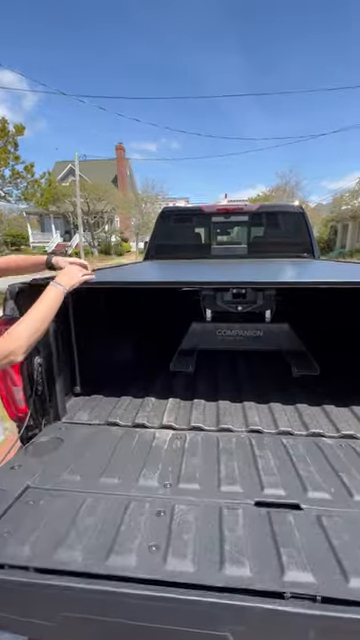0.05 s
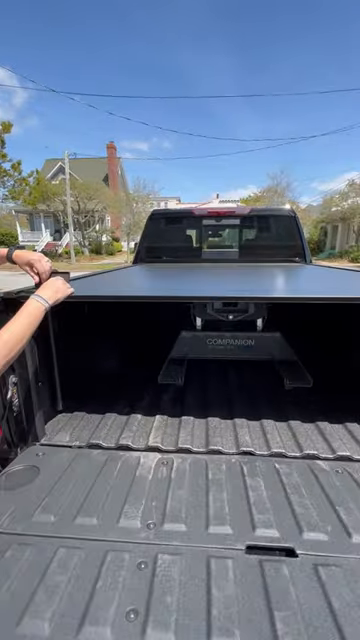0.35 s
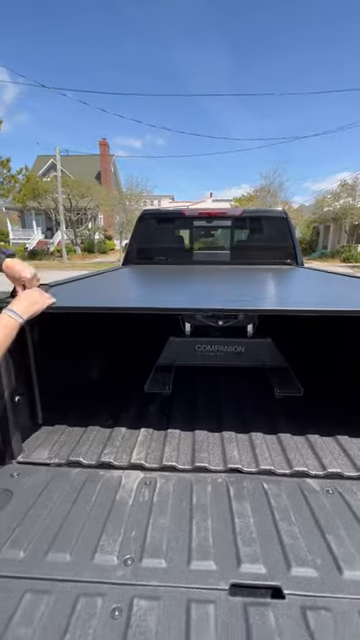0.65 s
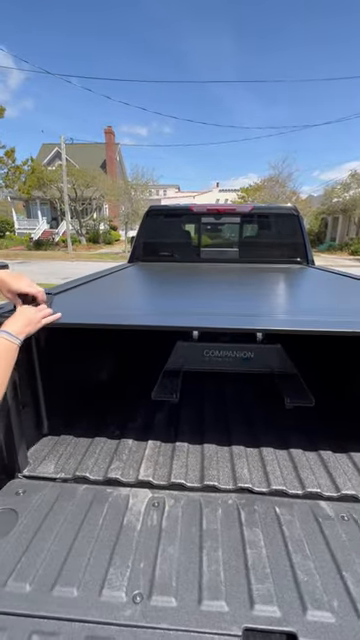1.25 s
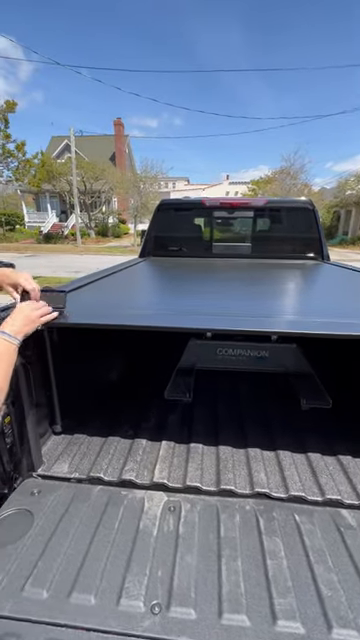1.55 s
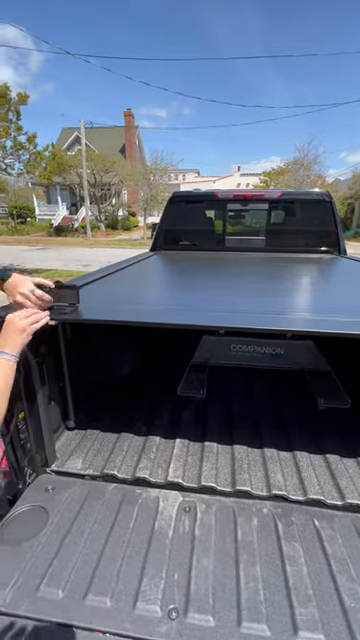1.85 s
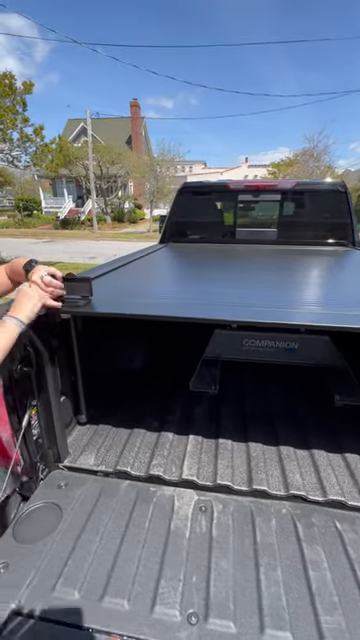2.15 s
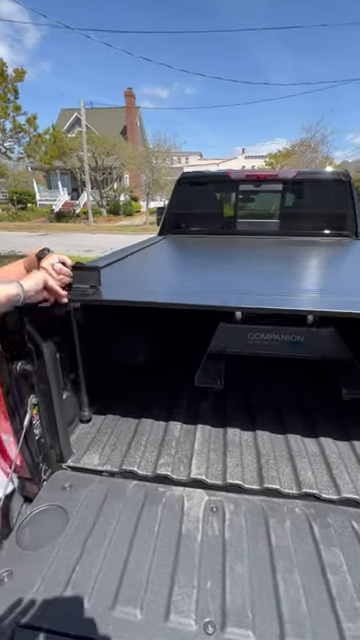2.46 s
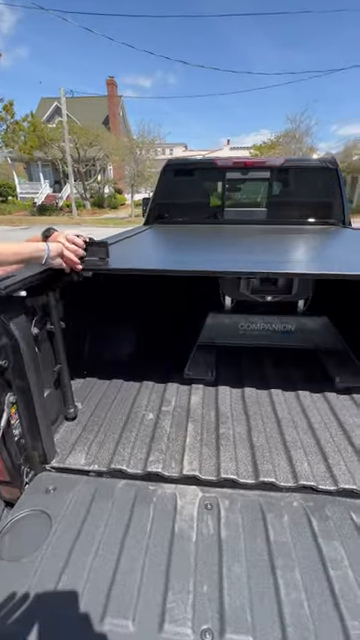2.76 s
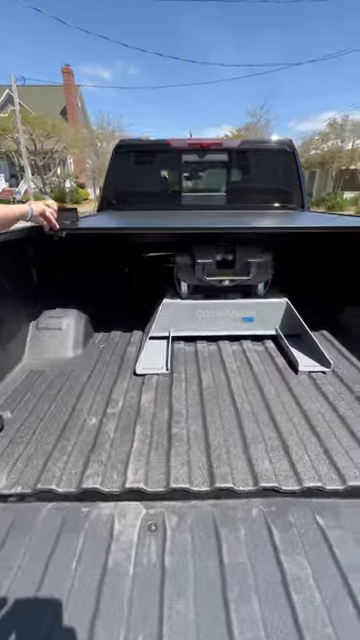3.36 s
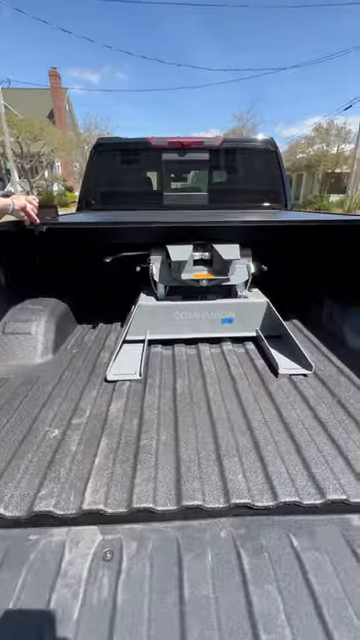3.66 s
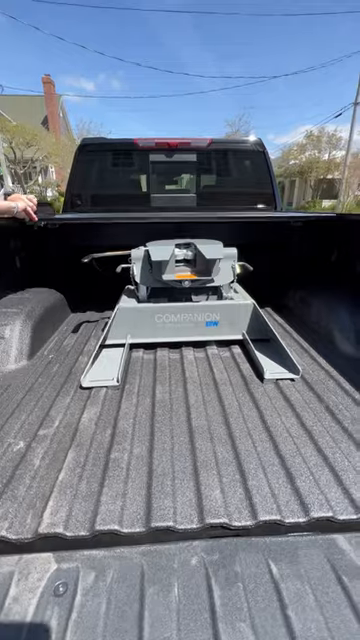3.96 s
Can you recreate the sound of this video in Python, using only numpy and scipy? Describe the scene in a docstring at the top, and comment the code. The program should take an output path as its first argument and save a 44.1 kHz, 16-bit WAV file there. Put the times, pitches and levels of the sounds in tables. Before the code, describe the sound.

Close by outdoors, a slatted truck bed cover clicks and scrapes at its latch, then slides open, clattering on metal rails and drumming on the hollow bed. A bird whistles faintly at first over a steady low hum.

```python
"""Outdoors, about a metre from a pickup bed, a slatted roll-up cover is unlatched and pushed open.
A low hum like an idling engine runs throughout, and a songbird whistles at first. Friction and impacts
excite the modes of the metal latch and the hollow bed. From about 2 s the slats rattle along their
metal rails and drum on the bed, and two resonances glide as the cover rolls up."""
import sys
import numpy as np
from scipy import signal
from scipy.fft import rfft, irfft
from scipy.io import wavfile
from scipy.ndimage import uniform_filter1d, map_coordinates

SR = 44100
rng = np.random.default_rng(int(sys.argv[2]) if len(sys.argv) > 2 else 0)


def waveform_to_disk(signal):
    """Save audio, clipped to [-1, 1], as 16-bit WAV at the path in sys.argv[1]."""
    frames = np.transpose(np.atleast_2d(signal))
    scaled = np.clip(frames, -1, 1) * 32767
    samples = np.round(scaled).astype(np.int16)
    wavfile.write(sys.argv[1], SR, samples)


N = 176400
T = np.arange(N) / SR
F = np.fft.rfftfreq(2 * N, 1 / SR)
ANTIPHASE = np.array([[1], [-1]])  # a side signal adds on the left and subtracts on the right

# modes of the metal latch (frequency [Hz], relative level [dB], T60 [s])
LATCH_MODES = [(1150, -7, 0.12), (1375, -10, 0.17), (1638, -11, 0.23), (2267, -5, 0.098), (2580, -14, .22),
               (2930, -15, 0.13), (3350, -5.5, 0.058), (3940, -14, 0.067), (4590, -14, 0.075),
               (5810, -6, 0.052), (5890, -21, 0.2), (7000, -5.5, 0.075), (7520, -10, 0.092),
               (8230, -8, 0.077)]


def undb(db):
    """Amplitude ratio of a level in decibels."""
    return np.exp(np.asarray(db) * (np.log(10) / 20))


def unit(x):
    """Normalisation to an rms of 1."""
    return x / np.sqrt(np.mean(x ** 2))


def noise():
    """Gaussian white noise."""
    return rng.standard_normal(N)


def gains(points):
    """Magnitude response through points of (frequency [Hz], level [dB])."""
    hz, db = np.array(points).T
    return undb(np.interp(np.log(F + 1), np.log(hz), db))


def shape(x, response):
    """Convolution as a product of spectra."""
    return irfft(rfft(x, 2 * N) * response)[..., :N]


def walk(rate):
    """Random modulation of rms 1, interpolated between `rate` values a second."""
    return unit(np.interp(T * rate, np.arange(4000), rng.standard_normal(4000)))


def wide(response, side):
    """Coloured stereo noise; an independent side signal lowers the coherence of the channels."""
    mid, edge = (unit(shape(noise(), response)) for _ in range(2))
    return mid + side * edge * ANTIPHASE


def decay(t, t60):
    """Exponential damping from t = 0, by 60 dB in t60 seconds."""
    return (t >= 0) * np.exp(-np.log(1000) * np.maximum(t, 0) / t60)


def street():
    """Broadband rumble under hum partials with slow amplitude and phase modulation."""
    air_spectrum = [(20, -77), (42, -1.5), (80, 5), (125, 0), (230, -6), (330, -19), (700, -20.5),
                    (1500, -30.5), (3300, -35.5), (6000, -43), (9000, -53), (14000, -58)]  # outdoor rumble (frequency [Hz], level [dB])
    air_levels = [(0, -46.5), (1.2, -44), (2, -45.5), (4, -39)]  # its envelope (time [s], level [dB])
    hum_partials = [(81, -50), (129, -51), (210, -58), (291, -68)]  # engine-like hum (frequency [Hz], level [dB])
    air, spread = gains(air_spectrum), gains([(100, -13.5), (400, -3.5), (2000, 1)])
    side = shape(noise(), air * spread) / np.std(shape(noise(), air))
    rumble = unit(shape(noise(), air)) + side * ANTIPHASE
    hum = sum(np.sqrt(2) * undb(db + 1.6 * walk(7.9)) * np.sin(2 * np.pi * hz * T + 0.28 * walk(5.4))
              for hz, db in hum_partials)
    return rumble * undb(np.interp(T, *np.array(air_levels).T)) + hum


def metal_noise(spectrum, lift_db=5, width_hz=170):
    """Resonance lifts a noise spectrum around each mode of the latch."""
    peaks = sum(1 / (1 + (2 * (F - hz) / width_hz) ** 2) for hz, _, _ in LATCH_MODES)
    return wide(gains(spectrum) * undb(lift_db * peaks), side=0.74)


def scrapes(tick, hollow, rise_s=0.00099, release_s=0.023):
    """Friction with an uneven grip drives the latch and the bed with modulated noise."""
    # rubs of latch and cover (time [s], duration [s], body level [dB], treble level [dB])
    strokes = [(0, 0.041, -55, -56.5), (0.06, 0.12, -62.5, -75), (0.959, 0.055, -56.5, -65.5),
               (1.107, 0.01, -55, -75), (1.155, 0.047, -55, -72), (1.189, 0.15, -60.5, -80),
               (1.687, 0.04, -55, -68)]
    rub_spectrum = [(100, -5), (600, -0.5), (1600, -4.5), (3500, -5.5), (5000, -23), (12000, -35)]  # friction noise (frequency [Hz], level [dB])
    rub = metal_noise(rub_spectrum) + undb(-3.5) * hollow
    grip = undb(3 * walk(170))
    out = np.zeros((2, N))
    for start, length, db, treble_db in strokes:
        envelope = np.clip((T - start) / rise_s, 0, 1)
        envelope *= np.exp(-np.maximum(T - start - length, 0) / release_s)
        out += envelope * grip * (undb(db) * rub + undb(treble_db) * tick)
    return out


def latch():
    """Impact and friction excite the same resonators: the metal latch and the hollow bed."""
    # spectra of click, bright tick and hollow bed (frequency [Hz], level [dB])
    click_spectrum = [(100, -12), (400, 4), (750, -7), (1200, 5), (2500, 4), (3400, 3), (4400, -2.5),
                      (4900, -17), (5800, -12), (9000, -26), (14000, -48)]
    tick_spectrum = [(2000, -4), (4800, 2), (5800, 2.5), (7000, -0.5), (8400, 3), (9400, 1), (10500, -7.5),
                     (12000, -1), (15000, -25)]
    bed_spectrum = [(120, -29), (230, 1.5), (370, -3.5), (470, -4.5), (600, -2), (850, -2.5), (1100, -16),
                    (2000, -51)]
    body, tick = metal_noise(click_spectrum), metal_noise(tick_spectrum)
    hollow = wide(gains(bed_spectrum), side=0.41)
    return (clicks(body, tick, hollow) + scrapes(tick, hollow)) * undb(0.35 * ANTIPHASE)


def bird():
    """Frequency-modulated whistles and falling slurs, scattered by leaves and reflected by houses."""
    # contour of a whistle (time from onset [s], frequency [Hz], relative level [dB])
    contour = [(0, 2692, -12), (.005, 2760, -1.5), (0.019, 2887, -8), (0.035, 3164, -9), (.05, 2946, -9),
               (0.058, 2605, 0), (0.073, 2525, 1), (.105, 2470, -2), (.12, 2450, -14), (.13, 2430, -35)]
    whistles = [(.436, -44, 0.98), (0.613, -45, 0.97)]  # calls (time [s], level [dB], pitch [ratio])
    # falling notes (time [s], duration [s], start [Hz], end [Hz], level [dB], pitch waver [ratio])
    slurs = [(0.068, 0.032, 4880, 4250, -53.5, .004), (0.257, 0.073, 5580, 4680, -65.5, .05),
             (0.309, 0.066, 3840, 2960, -61, .05), (0.412, 0.044, 3670, 3110, -51.5, .03),
             (0.596, 0.028, 3400, 3050, -53.5, 0.028)]
    song, waver, wobble = np.zeros(N), 1 + 0.021 * walk(250), walk(301)
    times, hz, db = np.array(contour).T
    for start, call_db, ratio in whistles:
        phase = 2 * np.pi * np.cumsum(np.interp(T - start, times, hz) * ratio * waver) / SR
        tone = np.sin(phase) + undb(-33) * np.sin(2 * phase) + undb(-31) * np.sin(3 * phase)
        song += undb(call_db + np.interp(T - start, times, db, left=-120, right=-120)) * tone
    for start, length, start_hz, end_hz, slur_db, depth in slurs:
        progress = np.clip((T - start) / length, 0, 1)
        pitch = start_hz * (end_hz / start_hz) ** progress * (1 + depth * wobble)
        song += undb(slur_db) * np.sin(np.pi * progress) * np.sin(2 * np.pi * np.cumsum(pitch) / SR)
    song *= undb(1.5 * walk(151.2))  # the level flutters
    houses, leaves = (unit(rng.standard_normal((2, N)) * decay(T - 0.016, t60)) / np.sqrt(N)
                      for t60 in (1, 0.14))
    return song + shape(song, rfft(undb(-4.5) * houses + undb(2) * leaves, 2 * N))


def thuds(log_spread=0.354):
    """Impacts of the cover set clusters of low, damped modes of the hollow bed in free vibration."""
    knocks = [(0.492, -31, 79.5), (.822, -41, 236.5), (.91, -36, 62), (1.463, -28, 215.3),
              (1.478, -29, 129.6), (1.496, -35.5, 275), (1.556, -36, 101), (1.571, -42.5, 278),
              (2.313, -18, 257.4), (2.382, -33, 127), (2.469, -9.5, 212.8), (2.532, -12.5, 226),
              (2.561, -22, 96), (2.608, -18, 215), (2.725, -17.5, 707), (2.842, -13.5, 221.3),
              (2.939, -17.5, 321.4), (3.135, -17, 641.6), (3.617, -20.5, 269), (3.808, -29, 321)]  # cover on bed (time [s], level [dB], centre frequency [Hz])
    out, t = np.zeros((2, 2 * N)), T[:SR // 2]
    envelope = decay(t, t60=0.23) * np.minimum(t / 0.0031, 1)
    rms, weights = np.sqrt(np.mean(envelope ** 2)), np.hanning(14)[1:-1]
    for start, db, centre_hz in knocks:
        offsets = np.linspace(-1.5, 1.5, 12) + 0.103 * rng.standard_normal(12)
        mode_hz = centre_hz * np.exp(log_spread * offsets)[:, None]
        clusters = (weights @ np.sin(2 * np.pi * (mode_hz * t + rng.random((12, 1)))) for _ in range(2))
        mid, side = (rms * unit(envelope * cluster) for cluster in clusters)
        first = int(start * SR)
        out[:, first:first + len(t)] += undb(db) * (mid + 0.16 * side * ANTIPHASE)
    return out[:, :N]


def latch_ring(t, click_db, tick_db, favoured_hz, lift_db):
    """Free vibration as a sum of damped modes; the point of contact favours those near one frequency."""
    ring = np.zeros((2, len(t)))
    for hz, mode_db, t60 in LATCH_MODES:
        drive_db = tick_db if hz > 5000 else click_db
        drive_db += lift_db * np.exp(-(np.log(hz / favoured_hz) / 0.29) ** 2)
        amplitude = undb(drive_db + mode_db + 1.8 * rng.standard_normal())
        detuned_hz = hz * (1 + 0.0046 * rng.standard_normal())
        phase = 2 * np.pi * detuned_hz * t + rng.uniform(0, 2.76, (2, 1))
        ring += amplitude * decay(t, t60) * np.sin(phase)
    return ring


def clicks(body, tick, hollow, attack_s=0.0045, tick_span=1.03):
    """Impulsive excitation gives a crack, a bright tick, a metallic ring and a boom of the bed."""
    # impacts of latch and slats (time [s], click level [dB], tick level [dB], tick centre [Hz],
    # noise T60 [s], favoured ring frequency [Hz], its lift [dB])
    impacts = [(0.811, -47, -77, 6000, 0.15, 3400, 0), (.877, -51, -55, 7400, 0.14, 3400, 3),
               (1.249, -37, -45.5, 7140, .07, 2850, 9), (1.315, -39.5, -70, 6000, 0.095, 1440, 8),
               (1.327, -42, -46.5, 7000, 0.052, 6100, 19), (1.387, -43, -58, 7360, 0.31, 7400, 17),
               (1.436, -29.5, -30.5, 8500, 0.034, 2500, 8), (1.446, -29.5, -25.5, 5600, 0.069, 5750, 8),
               (1.456, -35, -35, 6000, 0.13, 5800, 5), (1.730, -65, -33.5, 8450, 0.083, 8260, 6),
               (1.739, -40, -49, 9000, 0.42, 3200, 18.5), (1.75, -49, -61, 9100, 0.22, 3100, 13),
               (1.853, -60, -50, 8600, 0.066, 8300, -7), (1.858, -44.5, -47, 5770, 0.074, 3360, 19),
               (1.925, -47, -56, 9000, 0.13, 3300, 7), (1.953, -48.5, -64, 8500, .07, 3820, 15),
               (2.084, -47.5, -58, 8050, .08, 3400, 14.5), (2.148, -40.5, -60, 7000, 0.11, 2300, 2),
               (2.199, -44, -40, 7950, 0.17, 8300, 1), (2.312, -37, -59, 6000, 0.074, 2300, 7),
               (2.416, -18.5, -31.5, 8130, 0.1, 4000, 14), (2.471, -21.5, -40, 6000, 0.13, 2600, -5),
               (3.284, -23, -35, 7000, 0.087, 3400, -2), (3.345, -29, -30.5, 7450, 0.097, 5850, 3),
               (3.606, -33, -34, 6030, 0.1, 2300, -6), (3.707, -18.5, -39, 6000, 0.07, 1400, 4)]
    out = np.zeros((2, N))
    for start, db, tick_db, tick_hz, t60, favoured_hz, lift_db in impacts:
        first = int(start * SR)
        t = T[:min(SR // 3, N - first)]
        span = slice(first, first + len(t))
        attack = np.minimum(t / attack_s, 1)
        crack, tail = undb(15) * np.exp(-t / 0.0035), undb(-12) * decay(t, t60=0.26)
        envelope = undb(-11.5) * (crack + decay(t, t60) + tail)
        band = signal.butter(1, [tick_hz / tick_span, tick_hz * tick_span], "band", fs=SR, output="sos")
        bright = undb(-6.5) * tick[:, span] + undb(6.5) * signal.sosfilt(band, tick[:, span])
        burst = envelope * (undb(db) * body[:, span] + undb(tick_db) * bright)
        ring = undb(-8) * latch_ring(t, db, tick_db, favoured_hz, lift_db)
        boom = undb(db - 7.5) * np.minimum(t / 0.006, 1) * decay(t, t60=0.24) * hollow[:, span]
        out[:, span] += attack * (burst + ring) + boom
    return out


def contacts(count):
    """Transfer functions (mid, side) of points on the rails: dense random modes under shared peaks."""
    slat_modes = [(98, 17, 3), (319, 50, -1), (378.6, 16, 6.5), (563, 35, 5), (676, 54, 6), (770, 26, 4),
                  (805, 12, 2.5), (997, 29, -0.5), (1310, 54, 2.5), (1561, 24, 2), (2000, 41, 5),
                  (2200, 28, 7), (2430, 26, 3.5), (2680, 19, 3), (2780, 15, 5), (3040, 47, 1.5),
                  (3230, 35, 1), (3530, 38, 6.5)]  # slat and rail resonances (frequency [Hz], width [Hz], lift [dB])
    side_spectrum = [(50, -38), (120, -42), (220, -31), (350, -10.5), (640, -6.5), (1150, -5), (2000, -10),
                     (2800, 3.5), (3700, -3), (5500, -2), (8000, -9), (12000, 10.5)]  # stereo width (frequency [Hz], side minus mid [dB])
    paths = rfft(rng.standard_normal((count, 2, N)) * decay(T, t60=0.063), 2 * N)
    paths /= np.sqrt(uniform_filter1d(np.abs(paths) ** 2, size=800))  # flatten the broad trend
    peaks = undb(sum(lift / (1 + (2 * (F - hz) / width) ** 2) for hz, width, lift in slat_modes))
    return paths * peaks * np.array([np.ones(len(F)), gains(side_spectrum)])


def rattle(spectrum, level_db, jolts, paths, hits_per_s, spread_db, jolt_db):
    """Shot noise: dense random impacts, uneven in size, ring the slats and rails."""
    balance = [(60, 0), (110, -1), (200, -2), (350, -3), (640, -0.5), (1150, -1), (2080, 0.5), (3760, 3),
               (6800, 0), (12300, -0.5)]  # stereo position (frequency [Hz], left minus right [dB])
    hits = (rng.random((len(paths), N)) < hits_per_s / SR) * np.sign(noise())
    hits *= undb(spread_db * np.minimum(noise(), 2) + jolt_db * jolts)
    mid, side = (rfft(hits, 2 * N)[:, None] * paths).sum(axis=0) * gains(spectrum)
    lean = np.sqrt(gains(balance))
    out = irfft(np.array([(mid + side) * lean, (mid - side) / lean]))[:, :N]
    return out / np.std(out.mean(axis=0)) * undb(level_db)


def gliding_resonance(x, hz, width_hz):
    """A resonator with a moving natural frequency and unit gain at its centre."""
    carrier = np.exp(2j * np.pi * np.cumsum(hz) / SR)
    pole = np.exp(-np.pi * width_hz / SR)
    return 2 * np.real(carrier * signal.lfilter([1 - pole], [1, -pole], x / carrier))


def slide(slats_per_s=13, detune=0.01):
    """Forced vibration: the cover runs, slows and is pushed again; jolts modulate five bands together."""
    # envelopes of the cover (time [s], rumble [dB], drumming [dB], clatter [dB], rail [dB], hiss [dB])
    levels = [(2.05, -72, -54, -54, -89, -94), (2.098, -44, -72, -61, -57.5, -64.5),
              (2.218, -37.5, -34.5, -47, -46, -51), (2.295, -39, -46, -49.5, -50, -53),
              (2.316, -35, -30, -31, -36.5, -52), (2.374, -27, -29.5, -34.5, -42.5, -48),
              (2.43, -27.5, -17.5, -23.5, -27, -35.5), (2.468, -43, -22, -22, -23.5, -37.5),
              (2.57, -19, -19.5, -19, -22, -34), (2.718, -35, -20, -19, -17.5, -30),
              (2.966, -33, -22.5, -19.5, -18.5, -31), (3.254, -44, -28.5, -26.5, -30.5, -43.5),
              (3.368, -25.5, -26.5, -25.5, -32, -37.5), (3.39, -32.5, -23, -24, -28.5, -41.5),
              (3.538, -28.5, -30, -26, -31.5, -44), (3.625, -32, -21.5, -21.5, -23.5, -35),
              (3.77, -39, -27, -25.5, -27, -39.5), (3.804, -30, -23.5, -24.5, -25.5, -36.5),
              (3.956, -39, -24.5, -24, -22, -31.5), (4.0, -31, -21, -30, -23.5, -32.5)]
    # spectra of those five bands (frequency [Hz], level [dB])
    rumble = [(20, -46), (32, -39), (48, 3.5), (72, -2), (96, 8.5), (125, 8), (170, -35.5)]
    drum = [(90, -38), (145, -2), (178, 5), (245, 2.5), (290, 5.5), (330, 4.5), (390, -3), (520, -51)]
    clatter = [(290, -36), (410, -0.5), (490, -2), (570, 0), (790, -2), (880, -3), (1000, -4.5),
               (1300, -38)]
    rail = [(750, -5.5), (1050, -0.5), (1500, 0), (1800, -1.5), (2250, -1), (2900, -3), (3450, -8),
            (4300, -7), (4900, -19), (7000, -63)]
    hiss = [(4000, -4.5), (4900, -5), (5250, 3), (6400, -0.5), (7000, -4), (7800, -6), (9000, -12),
            (11500, -16.5), (12000, -40), (15000, -58)]
    # the boom of the roll sinks and the ring of the rails climbs
    # (frequency at 2.45 s [Hz], slope [Hz/s], width [Hz], gain [dB])
    glides = [(226, -63, 50, -4.5), (1280, 577, 670, -9.5)]
    times, *columns = np.array(levels).T
    rumble_db, drum_db, clatter_db, rail_db, hiss_db = (
        np.interp(T, np.r_[times[0] - 0.05, times], np.r_[-100, column]) for column in columns)
    shake, paths = walk(rate=45.47), contacts(count=3)
    jolts = unit(shake - uniform_filter1d(shake, size=SR // 16))  # only the quick fluctuations
    bands = (
        rattle(rumble, rumble_db - 2, jolts, paths, hits_per_s=600, spread_db=1.5, jolt_db=0.8)
        + rattle(drum, drum_db - 2.5, jolts, paths, hits_per_s=500, spread_db=2, jolt_db=1)
        + rattle(clatter, clatter_db + 0.1, jolts, paths, hits_per_s=1000, spread_db=2, jolt_db=1.5)
        + rattle(rail, rail_db - 0.25, jolts, paths, hits_per_s=1000, spread_db=0.5, jolt_db=0.57)
        + rattle(hiss, hiss_db - 0.5, jolts, paths, hits_per_s=1100, spread_db=3.5, jolt_db=0.46))
    sound = bands + sum(undb(db) * gliding_resonance(bands, hz + slope * (T - 2.45), width)
                        for hz, slope, width, db in glides)
    warped = T + detune / slats_per_s * walk(slats_per_s)  # passing slats detune the sound a little
    return np.array([map_coordinates(channel, [warped * SR], order=5, mode="mirror") for channel in sound])


def scene():
    """Linear superposition of all the sources."""
    return latch() + thuds() + slide() + bird() + street()


def record(dry):
    """Soft saturation rounds the highest peaks; band limiting cuts the deepest bass and the top."""
    rounded = dry / (1 + (dry / 0.95) ** 4) ** 0.25
    rounded = signal.sosfilt(signal.butter(3, 36, "highpass", fs=SR, output="sos"), rounded)
    return signal.sosfilt(signal.ellip(8, 0.2, 70, 12100, fs=SR, output="sos"), rounded)


dry = scene()
out = record(dry)
waveform_to_disk(out)
```